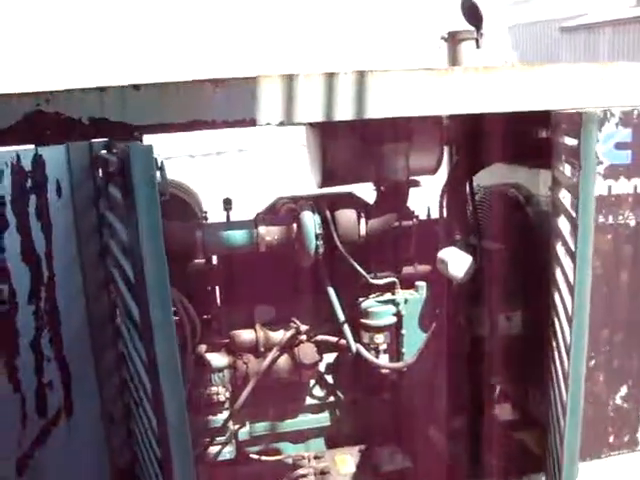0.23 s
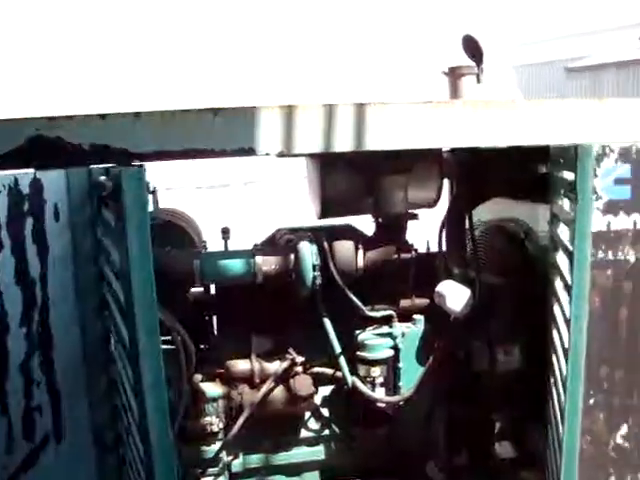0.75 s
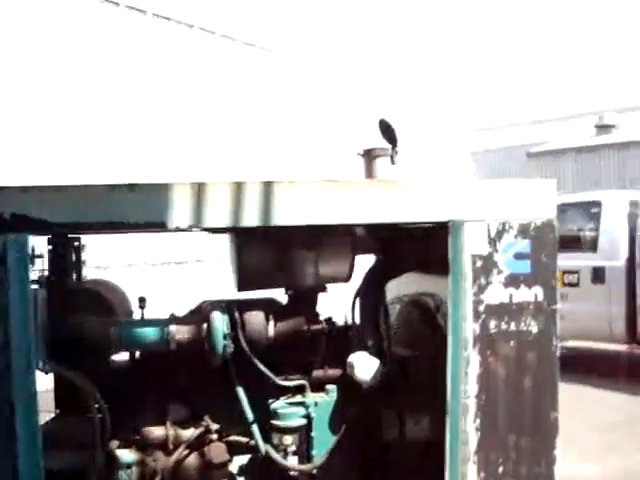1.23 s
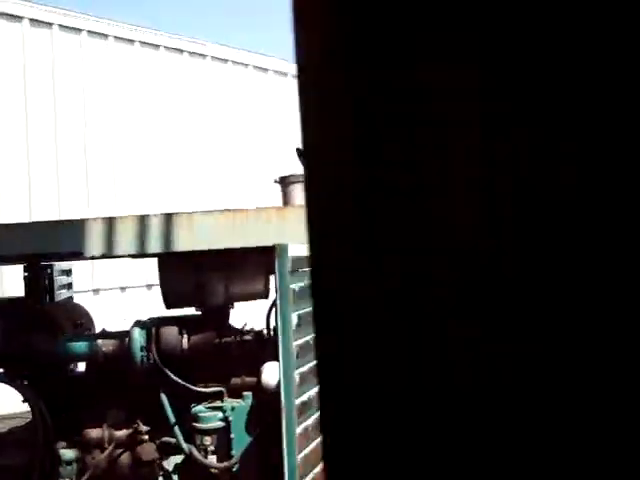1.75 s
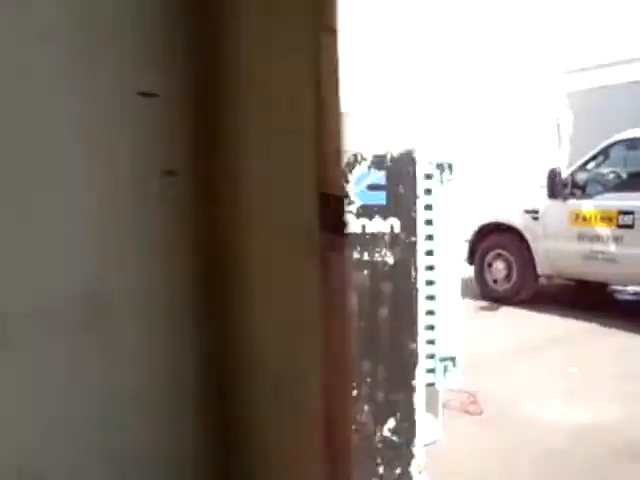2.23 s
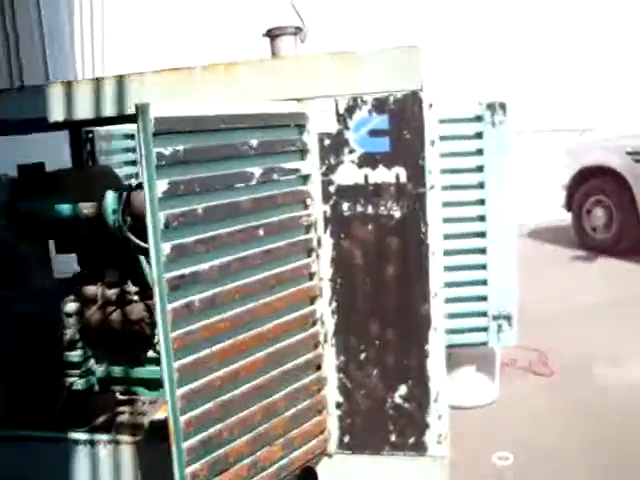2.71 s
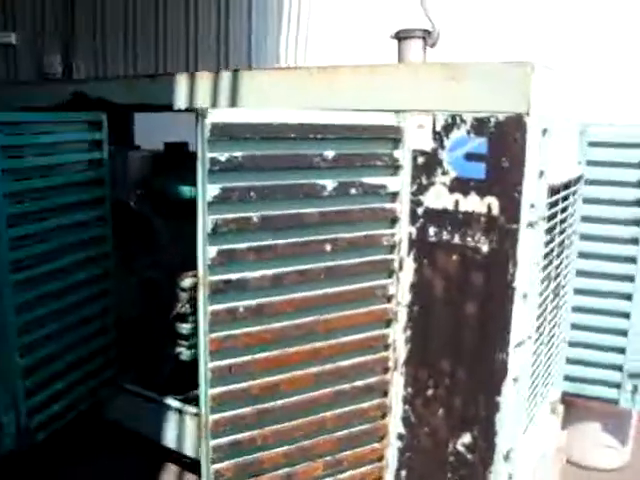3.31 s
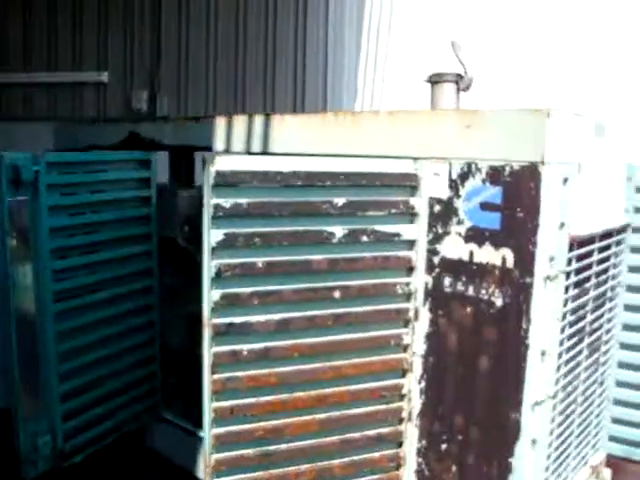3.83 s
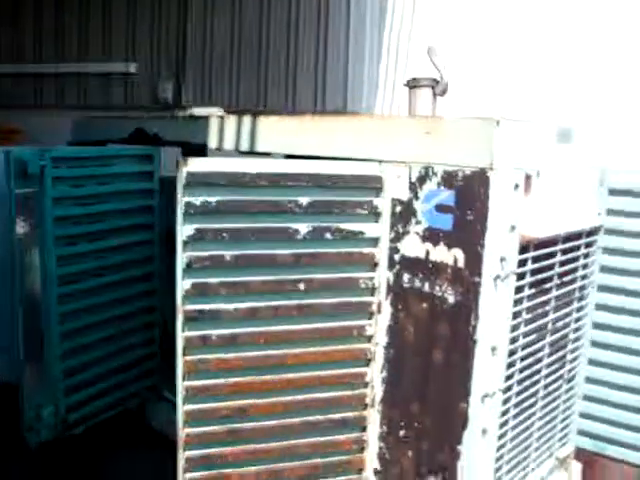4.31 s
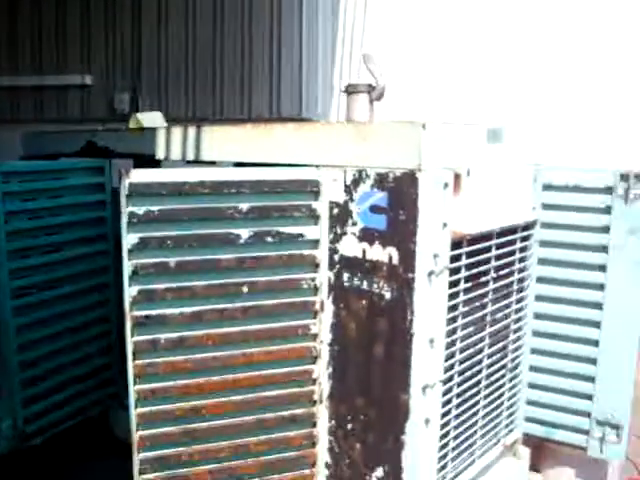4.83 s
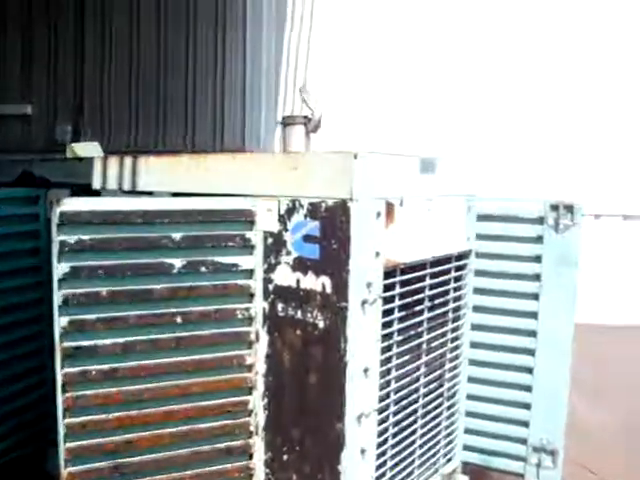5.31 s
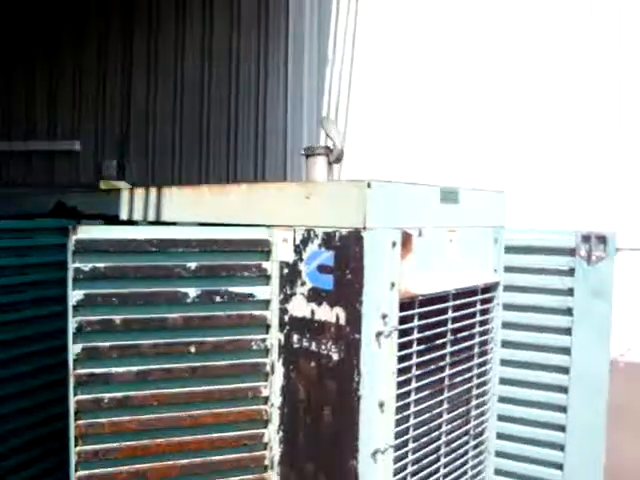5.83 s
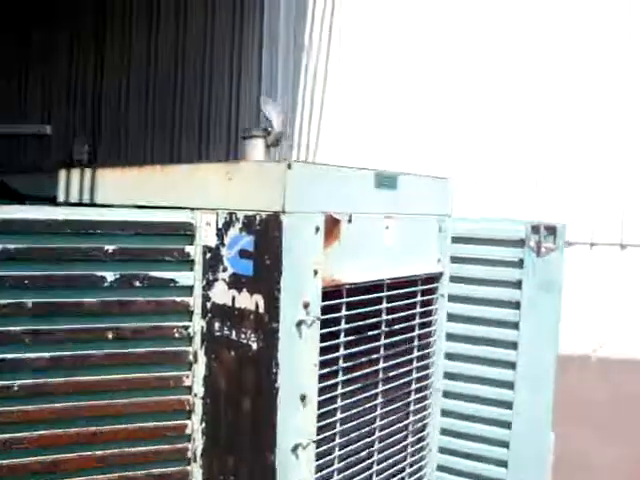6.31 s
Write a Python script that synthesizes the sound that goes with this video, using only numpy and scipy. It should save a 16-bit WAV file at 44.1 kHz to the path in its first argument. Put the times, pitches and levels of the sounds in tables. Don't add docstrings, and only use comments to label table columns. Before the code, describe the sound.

Steady, loud diesel engine roar with fast mechanical clatter, wavering fan tones and a thin gear whine, its colour shifting as the listener moves past.

```python
import sys
import numpy as np
from scipy import signal
from scipy.fft import rfft, irfft, next_fast_len
from scipy.io import wavfile
from scipy.ndimage import uniform_filter1d, map_coordinates

SR = 44100
rng = np.random.default_rng(int(sys.argv[2]) if len(sys.argv) > 2 else 0)


def transcribe(signal):
    frames = np.atleast_2d(signal).T
    limited = np.clip(frames, -1, 1)
    pcm = np.round(limited * 32767).astype(np.int16)
    wavfile.write(sys.argv[1], SR, pcm)


def volts_from_db(level):
    exponent = np.asarray(level, float) / 20
    return 10 ** exponent


N = 289296
CYCLE_HZ = 15.0
FIRING_HZ = 6 * CYCLE_HZ


def unit(x):
    return x / np.sqrt(np.mean(x ** 2) + 1e-20)


def along(points, hz):
    f, v = np.transpose(points)
    return np.interp(np.log(hz + 1), np.log(f + 1), v, left=-120, right=-120)


def curves(rows):
    s, *cols = np.transpose(rows)
    return [np.interp(np.arange(N) / SR, s, c) for c in cols]


def wobble(rate_hz):
    coarse = np.arange(0, N + 64, 64)
    knots = rng.standard_normal(int(N * 40 / SR) + 4)
    smooth = map_coordinates(knots, [coarse * min(rate_hz, 40) / SR])
    return np.interp(np.arange(N), coarse, smooth)


def filtered(x, response):
    m = next_fast_len(N + 8192)
    return irfft(rfft(x, m) * response(np.fft.rfftfreq(m, 1 / SR)), m)[..., :N]


def tone(hz, db, sway_db, drift_rad):
    phase = 2 * np.pi * (np.cumsum(hz * np.ones(N)) / SR + rng.random())
    level = volts_from_db(db + sway_db * wobble(2.33))
    drift = drift_rad * (wobble(3.226) + .45 * wobble(14))
    return np.sqrt(2) * level * np.sin(phase + drift)


# (frequency [Hz], density [dB per Hz])
ROAR_SPECTRUM = [(15, -74), (25, -41), (79, -37.5), (134, -30.5), (191, -13), (265, -15), (386, -2.5),
                 (449, -1.5), (780, 2.5), (1230, 3.5), (1830, 0), (2670, -1.5), (6110, -5.5), (9130, -12.5),
                 (10100, -19), (13100, -58), (22000, -120)]


def roar():
    z = signal.stft(rng.standard_normal(N + 512), nperseg=512)[2]
    across_hz = uniform_filter1d(rng.standard_normal(z.shape), size=4, axis=0)
    patches = uniform_filter1d(across_hz, size=40, axis=1)
    noise = signal.istft(z * volts_from_db(0.36 * unit(patches)), nperseg=512)[1][:N]
    air = filtered(noise, lambda hz: volts_from_db(along(ROAR_SPECTRUM, np.minimum(hz, 9500))))
    firing = .11 * np.cos(2 * np.pi * FIRING_HZ * np.arange(N) / SR)
    flutter = volts_from_db(.65 * wobble(32) + .4 * wobble(12)) - 1
    bright = filtered(air, lambda hz: hz ** 2 / (hz ** 2 + 1500 ** 2))
    return unit(air + bright * flutter + (air - bright) * firing)


BEAMED_HZ = [394.4, 591.7, 789.2, 986.8, 1110, 1183.5, 1439.8, 1532.9]
# (enter [s], leave [s], level [dB rms])
BEAMS = [
    [(0, 6.6, -44), (1.38, 5.1, -42), (1.38, 2.45, -46), (2.7, 3.1, -38)],
    [(0, 1.2, -43), (3.6, 5.5, -36.5)],
    [(2.0, 2.25, -32), (2.9, 3.6, -34), (4.4, 5.2, -38), (5.5, 6.6, -34.5)],
    [(.8, 1.2, -34), (2.0, 2.2, -33), (2.55, 3.3, -31), (3.3, 4.1, -36), (6.2, 6.7, -33)],
    [(1.05, 1.3, -31), (2.6, 3.0, -36)],
    [(0, .75, -34), (1.3, 2.0, -36), (2.2, 2.4, -34), (3.3, 3.85, -35), (4.2, 4.6, -35), (5.2, 5.9, -39)],
    [(0, 1.2, -34), (1.8, 2.35, -37), (2.8, 3.4, -38)],
    [(.85, 1.2, -35), (1.4, 2.4, -33), (2.65, 4.7, -30), (5.5, 5.75, -33)],
]
BETWEEN_DB, RIM_S = -53.5, 0.07


def strong_tones():
    t, out = np.arange(N) / SR, 0
    for hz, beams in zip(BEAMED_HZ, BEAMS):
        inside = 0
        for enter_s, leave_s, db in beams:
            gate = (np.tanh((t - enter_s) / RIM_S) - np.tanh((t - leave_s) / RIM_S)) / 2
            inside = inside + volts_from_db(db) * gate
        out = out + (volts_from_db(BETWEEN_DB) + inside) * tone(hz, 0, sway_db=hz / 1200, drift_rad=hz / 3000)
    return out


# (frequency [Hz], level [dB])
KNOCK_SPECTRUM = [(500, -42), (600, -16), (800, -12), (1100, 4), (1450, -3), (1750, -15), (2400, 4),
                  (3500, -2.5), (5000, -33)]


def block(renew_s=0.5265):
    size = round(SR / CYCLE_HZ)
    place = np.arange(N) / SR / renew_s
    patterns = rng.standard_normal((40, size))
    now, at = place.astype(int), np.arange(N) % size
    turn = np.pi / 2 * (place - now)
    knock = np.cos(turn) * patterns[now, at] + np.sin(turn) * patterns[now + 1, at]
    return unit(filtered(knock, lambda hz: volts_from_db(along(KNOCK_SPECTRUM, hz))))


def clatter(decay_ms=1.4, scatter_db=5):
    count = int(N / SR * FIRING_HZ)
    draws = rng.standard_normal((count, 2))
    at = (np.arange(count) + .5 + 0.072 * draws[:, 0]) * SR / FIRING_HZ
    blows = np.bincount(at.astype(int), volts_from_db(scatter_db * draws[:, 1]), N)[:N]
    decay = np.exp(-np.arange(1500) / (decay_ms * SR / 1000))
    bursts = signal.fftconvolve(blows, decay)[:N] * rng.standard_normal(N)
    return unit(filtered(bursts, lambda hz: 1j * hz * 3200 / (2900 ** 2 - hz ** 2 + 1j * hz * 3200)))


# (multiple of the cycle [1], level [dB rms])
EXHAUST = [(7, -79), (8, -66.5), (9, -64), (10, -75), (11, -70), (14, -61.5), (16, -54.5), (17, -62.5),
           (18, -53.5), (19, -66), (20, -51.5), (21, -52), (24, -45.5), (27, -52.5), (28, -71), (30, -68.5),
           (34, -40), (50, -41), (52, -38.5), (58, -51.5), (73, -45), (88, -37.5), (92, -38.5),
           (110, -56.5), (112, -54)]


def exhaust():
    speed_hz = CYCLE_HZ * (1 + 0.0003443 * wobble(0.844))
    return sum(tone(k * speed_hz, db, sway_db=2.1, drift_rad=.3) for k, db in EXHAUST)


POST_S, POST_WIDTH_S = 2.32, 0.15


def near_post():
    return np.exp(-.5 * ((np.arange(N) / SR - POST_S) / POST_WIDTH_S) ** 2)


# (frequency [Hz], level [dB rms], lift at post [dB], loss behind door [dB], sink time [s])
HUMS = [
    (90.0, -55, 2.5, 5.5, 3.3),
    (180.7, -48.5, 6, 10.5, 0.46),
    (206.4, -48.5, 7.5, 8, 2),
    (226, -55, 14, 6, 0.92),
    (331, -43, -7, 1, 1.2),
]
DOOR_S = 2.656


def hums():
    t, out = np.arange(N) / SR, 0
    for hz, db, lift_db, loss_db, sink_s in HUMS:
        hidden = np.clip((t - DOOR_S) / sink_s, 0, 1)
        out = out + tone(hz, db + lift_db * near_post() - loss_db * hidden, hz / 900, hz / 1400)
    return out


# (frequency [Hz], level [dB rms])
FAN = [(197.2, -55.5), (1577, -56)]
# (frequency [Hz], level [dB rms])
ALTERNATOR = [(412.4, -49), (618.6, -62.5), (826.3, -53.5), (1051.8, -37), (1261.7, -38), (1682, -49),
              (3150.5, -61), (3569.2, -45)]


def rotors():
    return sum(tone(hz, db, min(1.2 + hz / 300, 3.6), min(hz / 1500, 1)) for hz, db in FAN + ALTERNATOR)


# (time [s], extra path [ms], strength [0-1])
GROUND = [(0, 1.42, .3), (.9, .92, .22), (1.3, .78, .45), (1.75, .7, .6), (2.02, .67, 0), (3, 1.3, 0),
          (5.3, 1.25, .3), (6.56, 1.3, .15)]


def ground(x):
    path_ms, share = curves(GROUND)
    dull = filtered(x, lambda hz: 1 / (1 + (hz / 1450) ** 6))
    late = np.interp(np.arange(N) - path_ms * SR / 1000, np.arange(N), dull)
    return x + share * late


# (time [s], level [dB], treble shade [dB])
WALK = [(0, -19.5, 1), (.8, -20.5, 1.5), (1.2, -19, 0), (1.8, -19, -1.5), (2.2, -18, -3.5), (2.6, -18, -3),
        (3.3, -18, -2), (4.1, -19, 0), (4.7, -19.5, 1), (5.3, -19, -.6), (5.8, -19.5, 0.9),
        (6.56, -19.5, 0.5)]
CROSS_HZ = [300, 1000, 3000]
RANGE_DB = [
    -24.5,
    -6,
    -2.5,
    -5,
]
POST_THRUM_DB = 4


def walk(x):
    level_db, shade_db = curves(WALK)
    below = [filtered(x, lambda hz: 1 / (1 + (hz / edge) ** 6)) for edge in CROSS_HZ]
    ranges = np.diff([0 * x, *below, x], axis=0)
    changes_db = [POST_THRUM_DB * near_post() + 0.37 * shade_db, 0.19 * shade_db, 0, shade_db]
    return sum(volts_from_db(level_db + db + change) * unit(part)
               for db, change, part in zip(RANGE_DB, changes_db, ranges))


def scene():
    noises = volts_from_db(-16.0) * roar() + volts_from_db(-30.0) * block() + volts_from_db(-37.5) * clatter()
    machine = noises + exhaust() + rotors()
    return np.tile(walk(ground(machine)) + strong_tones() + hums(), (2, 1))


TOP_HZ = 10160


def stepped_treble(x):
    chance, scatter_db, step = .065, .8, 340
    blocks = N // step + 1
    need = rng.exponential(1, blocks) ** .7
    out = filtered(x, lambda hz: hz < 5000)
    for low in range(5000, TOP_HZ, 500):
        present = rng.random(blocks) > chance * need
        kept = present * volts_from_db(scatter_db * rng.standard_normal(blocks))
        gain = uniform_filter1d(kept.repeat(step)[:N], size=110)
        out = out + gain * filtered(x, lambda hz: (hz >= low) & (hz < low + 500))
    return out


# (time [s], low edge [Hz], high edge [Hz])
SIDE_BURSTS = [(.47, 8300, 9650), (.703, 6900, 9000), (.772, 5150, 6200), (.772, 6900, 8300), (1.817, 8300, 9650),
               (2.189, 4150, 5150), (2.328, 6200, 8300), (2.491, 4150, 6900), (3.048, 4150, 5150),
               (3.048, 6200, 7600), (3.536, 7600, 9650), (3.582, 6200, 7600), (3.652, 4650, 7600),
               (4.209, 7600, 9000), (4.302, 6200, 7600), (4.882, 4650, 6900), (5.533, 8300, 9650)]


def side_noise():
    half = round(.023 * SR)
    hz = np.fft.rfftfreq(2 * half, 1 / SR)
    noise = unit(filtered(rng.standard_normal(N), lambda f: volts_from_db(along(ROAR_SPECTRUM, f))))
    side = np.zeros(N + 4096)
    for s, lo, hi in SIDE_BURSTS:
        at = round(s * SR) - half
        band = irfft(rfft(noise[at:at + 2 * half]) * (hz > lo) * (hz < hi), 2 * half)
        side[at:at + 2 * half] += np.hanning(2 * half) * band
    return side[:N] * np.array([[1], [-1]])


def low_pass(x):
    return signal.sosfilt(signal.butter(12, 10840, fs=SR, output="sos"), x)


def record(dry):
    rumble = filtered(rng.standard_normal(N), lambda hz: 1 / (1 + (hz / 90) ** 2))
    mono = stepped_treble(dry[0] + volts_from_db(-74.5) * unit(rumble))
    limited = filtered(mono, lambda hz: volts_from_db(-.2 * np.clip(hz - TOP_HZ + 140, 0, 600)))
    return low_pass(limited + volts_from_db(-22.0) * side_noise())


dry = scene()
out = record(dry)
transcribe(out)
```